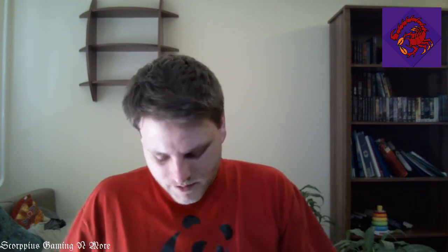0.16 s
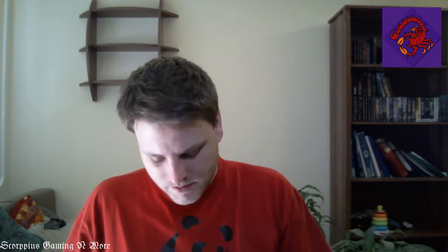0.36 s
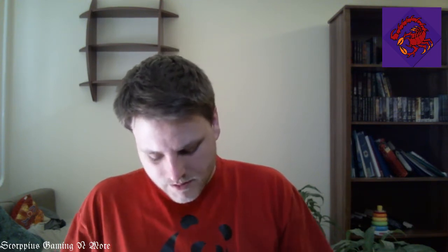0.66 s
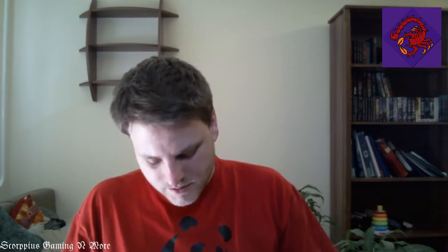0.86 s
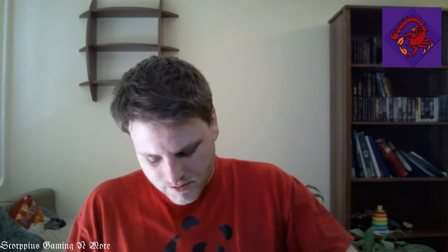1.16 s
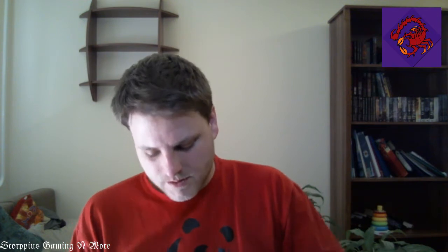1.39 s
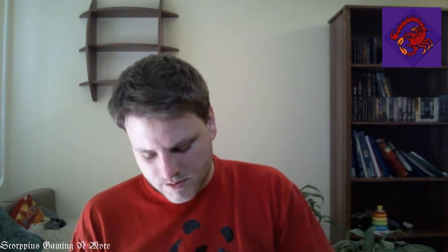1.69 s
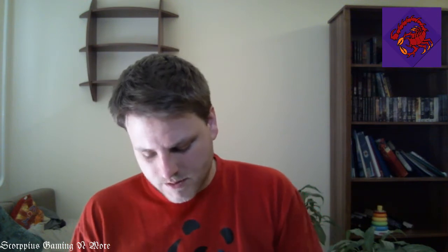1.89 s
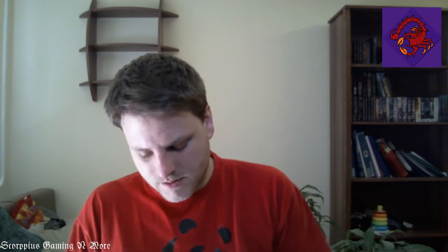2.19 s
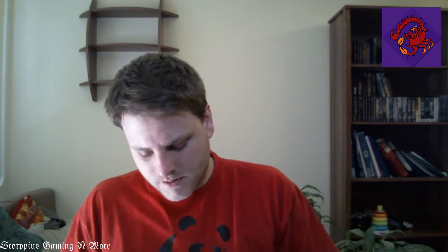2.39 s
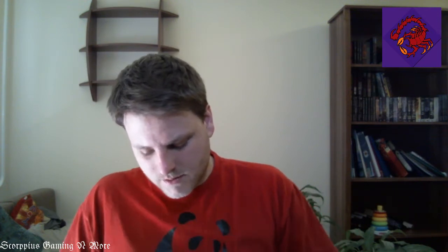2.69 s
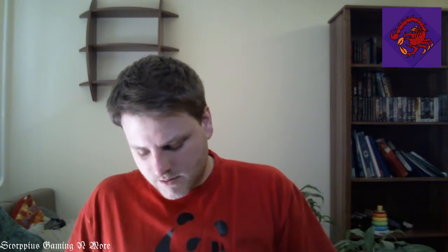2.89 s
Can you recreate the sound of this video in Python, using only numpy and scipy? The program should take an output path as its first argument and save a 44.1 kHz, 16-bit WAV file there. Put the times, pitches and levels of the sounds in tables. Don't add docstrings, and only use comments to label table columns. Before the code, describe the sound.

Stiff plastic packaging crinkles close to the microphone. From 0 to 1.1 s, short irregular squeezes give bright crackle and scattered snaps; from 1.15 to 1.55 s a dense tugging flurry with dull knocks. It eases until about 1.8 s, then builds to the sharpest cracks and a hollow thump around 2.15-2.4 s. Sparser, softer ticks follow to 3 s. Short room tail, faint low fan hum and air.

```python
import sys
import numpy as np
from scipy import signal
from scipy.fft import rfft, irfft, next_fast_len
from scipy.io import wavfile

SR = 44100
rng = np.random.default_rng(int(sys.argv[2]) if len(sys.argv) > 2 else 0)


def gain_from_db(level_db):
    decades = np.asarray(level_db, float) / 20
    return 10 ** decades


def transcribe(u):
    v = np.clip(np.atleast_2d(u).T, -1, 1)
    q = np.round(v * 32767).astype(np.int16)
    wavfile.write(sys.argv[1], SR, q)


N = 134505

# (time [s], facet level [dB], facet pitch [Hz], low voice [dB], bright edge [dB])
GRIP_SNAPS = [(0.0279, -26, 6780, -17, -11), (0.1292, -36, 7430, -9, 3), (0.1931, -28, 5150, -18, -9),
              (0.2011, -27, 4410, -6, -10), (0.3671, -31, 3320, -11, -7), (0.378, -31, 5640, -15, -3),
              (0.3812, -34, 3960, -8, -3), (0.4446, -29, 5210, -22, -4), (0.4699, -28, 5450, -5, -11),
              (0.5241, -30, 5120, -16, -3), (0.5275, -23, 5560, -14, -7), (0.5621, -31, 5020, -15, -2),
              (0.5759, -29, 6610, -13, -1), (0.5831, -26, 5810, -17, -1), (0.6288, -37, 6240, -5, 6),
              (0.6345, -32, 5210, -15, -6), (0.6825, -22, 5280, -16, -12), (0.6891, -26, 2710, -4, -2),
              (0.6981, -28, 5600, -13, -4), (0.8461, -17, 2730, -2, -10), (0.8549, -23, 3010, -2, -11),
              (0.8599, -28, 4720, -13, 1), (0.9078, -31, 3750, -7, 2), (0.913, -28, 6270, -9, -1),
              (0.9774, -33, 6270, -12, 4), (0.9849, -28, 5000, -17, -13), (1.0152, -28, 5060, -23, -7),
              (1.0192, -19, 3850, -17, -13)]
# (time [s], facet level [dB], facet pitch [Hz], low voice [dB], bright edge [dB])
TUG_SNAPS = [(1.1503, -29, 5040, -16, -1), (1.1607, -17, 3830, -10, -7), (1.171, -21, 3940, -19, -7),
             (1.1755, -30, 5470, -9, 3), (1.1894, -18, 5790, -10, -7), (1.1997, -20, 8050, -23, 0),
             (1.2092, -26, 6010, -9, -6), (1.2229, -34, 6220, -13, 2), (1.2273, -34, 3850, -9, 5),
             (1.2519, -32, 4970, -11, 6), (1.2671, -27, 5640, -13, -9), (1.2698, -30, 5640, -13, 4),
             (1.2851, -25, 5000, -15, -7), (1.2896, -25, 3290, -12, -9), (1.2968, -18, 6290, -12, -2),
             (1.3037, -21, 5210, -11, -1), (1.3092, -24, 2410, -3, -8), (1.3178, -25, 3850, -6, -5),
             (1.3279, -19, 5120, -5, -2), (1.363, -18, 6440, -16, 0), (1.3672, -19, 3010, -10, -2),
             (1.3717, -28, 6890, -13, 0), (1.3824, -27, 7880, -8, -1), (1.4109, -20, 5470, -10, -3),
             (1.4207, -19, 4260, -10, -11), (1.434, -22, 6890, -13, 0), (1.4573, -22, 2410, -5, -1),
             (1.4632, -30, 5230, -8, 1), (1.4739, -28, 5430, -11, -3), (1.4791, -19, 3620, -15, -11),
             (1.5237, -20, 4610, -24, -2), (1.5392, -27, 4390, -2, -6)]
# (time [s], facet level [dB], facet pitch [Hz], low voice [dB], bright edge [dB])
TURN_SNAPS = [(1.6246, -38, 3700, -12, 5), (1.7004, -38, 6090, -16, 4), (1.8194, -23, 6330, -31, -2),
              (1.8307, -28, 6140, -29, -3), (1.8328, -35, 5790, -26, -2), (1.8707, -34, 3920, -20, -7),
              (1.9656, -29, 3750, -8, -7), (1.981, -29, 6160, -8, -4), (2.0316, -34, 8140, -15, 1),
              (2.0916, -27, 7600, -14, -5), (2.1194, -31, 5230, -12, 6), (2.1395, -25, 5620, -12, 2),
              (2.1554, -16, 6270, -5, 1), (2.173, -24, 5730, -4, -2), (2.1802, -23, 6460, -15, -2),
              (2.183, -20, 5920, -14, -4), (2.2499, -28, 5100, -18, 1), (2.255, -33, 5750, -11, 4),
              (2.3079, -21, 6350, -11, 3), (2.3365, -21, 4540, -5, -4), (2.3403, -25, 5880, -6, -6),
              (2.3475, -28, 6200, -8, 4), (2.3626, -25, 3660, -9, 2), (2.372, -14, 6370, -14, 3),
              (2.3918, -19, 6830, -18, 0)]
# (time [s], facet level [dB], facet pitch [Hz], low voice [dB], bright edge [dB])
TEAR_SNAPS = [(2.4998, -33, 6420, -7, 9), (2.5317, -35, 5230, -13, 3), (2.5415, -32, 5100, -22, -4),
              (2.5916, -28, 4310, -8, -15), (2.5955, -19, 4310, -7, 0), (2.5996, -35, 8100, -8, 5),
              (2.6147, -28, 6910, -16, 2), (2.6299, -31, 4910, -12, -1), (2.6477, -26, 6270, -15, 0),
              (2.7161, -43, 8180, -8, 13), (2.7583, -31, 4130, -12, -15), (2.7971, -32, 7130, -13, -2),
              (2.8035, -37, 7880, -13, 5), (2.8416, -35, 6740, -15, -4), (2.8956, -38, 7190, -20, 1),
              (2.9325, -37, 5620, -20, -1), (2.9374, -31, 5190, -11, -11), (2.9829, -30, 3470, -11, -9),
              (3.0279, -31, 5280, -13, -10)]
# (time [s], facet level [dB], facet pitch [Hz], low voice [dB], bright
# edge [dB])
EXTRA_SNAPS = [
    (2.9657, -33.5, 5050, -5, -17),
]
# (start [s], length [s], crackle level [dB], flexing level [dB])
HAND_SQUEEZES = [(0, 0.064, -36, -54), (0.11, 0.087, -37, -56), (0.18, 0.12, -35.5, -52),
                 (0.288, 0.14, -40.5, -54), (0.453, 0.15, -33, -51.5), (0.619, 0.047, -36.5, -58),
                 (0.677, 0.074, -34, -42), (0.747, 0.14, -34, -70), (0.835, 0.08, -32.5, -44),
                 (0.93, 0.11, -36, -51), (1.037, 0.075, -36.5, -52), (1.139, 0.084, -34, -65),
                 (1.258, 0.088, -32, -50.5), (1.373, 0.057, -31, -41), (1.453, 0.039, -33, -42.5),
                 (1.504, 0.1, -34.5, -59), (1.621, 0.08, -42, -45), (1.719, 0.054, -36, -47.5),
                 (1.948, 0.1, -34, -48), (2.08, 0.11, -31, -38.5), (2.22, 0.056, -37.5, -53),
                 (2.306, 0.094, -33, -47), (2.335, 0.12, -36, -51.5), (2.5, 0.045, -38, -54),
                 (2.592, 0.088, -37.5, -53), (2.777, 0.075, -40, -60), (2.96, .12, -44.5, -56)]
# (time [s], peak level [dB])
PACK_KNOCKS = [(0.212, -34), (0.229, -31.5), (0.456, -34), (0.686, -27.5), (0.843, -50), (0.896, -39),
               (1.015, -33.5), (1.3, -32.5), (1.321, -28.5), (1.365, -26.5), (1.535, -27), (2.154, -16.5),
               (2.175, -29), (2.306, -27), (2.367, -24), (2.388, -28), (2.592, -28)]
# (time [s], pitch [Hz])
BODY_NOTE = [(.2, 494), (.7, 465), (.87, 785), (1.03, 547), (1.4, 670), (1.65, 353), (2.15, 450),
             (2.36, 388), (2.6, 494)]
# (frequency [Hz], level [dB])
FILM_SPECTRUM = [(300, -7.5), (900, -7), (2000, -7), (3700, -1), (6300, -1), (8000, -4), (10500, -2),
                 (16000, -8.5)]
# (frequency [Hz], width [Hz], level [dB])
FAN_RESONANCES = [(62, 22, -51.5), (84.3, 5, -54.5)]
# (frequency [Hz], level [dB])
AIR_SPECTRUM = [(15, 2), (100, -8.5), (300, -11.5), (1000, -19.5), (16000, -38.5)]


def snaps():
    decay_s, lead_s, crack = 0.00061, 0.00091, 4.45
    stretch = 0.21
    ring_width_hz, body_trim_db, trim_db = 320, -1, -0.06
    rows = GRIP_SNAPS + TUG_SNAPS + TURN_SNAPS + TEAR_SNAPS + EXTRA_SNAPS
    out = np.zeros(N + SR)
    t = np.arange(-132, 400) / SR
    core = (t > -0.0008) & (t < 0.0012)
    edges_hz = ((950, 2600), (2600, 8000), (8000, 17500))
    bands = [signal.butter(3, e, "band", fs=SR, output="sos") for e in edges_hz]
    draws = rng.standard_normal((len(rows), 2, len(t)))
    for (s, db, hz, body_db, edge_db), (noise, spikes) in zip(rows, draws):
        stretched = t / gain_from_db(stretch * (db + 27))
        shape = np.where(t < 0, 0.55 * np.exp(stretched / lead_s), np.exp(-stretched / decay_s))
        burst = shape * noise * np.exp(0.5 * spikes)
        burst = burst + crack * (t == 0) * np.sign(noise)
        body, middle, edge = (signal.sosfilt(band, burst) for band in bands)
        edge = resonate(edge, 9000 * gain_from_db(edge_db / 2 + 2), 9500)
        broad = rms_one(resonate(resonate(middle, hz, hz), hz, hz))
        facet = broad + rms_one(resonate(middle, hz, ring_width_hz))
        start = int(s * SR) - 138
        for voice, voice_db in ((body, body_db + body_trim_db), (facet, 0), (edge, edge_db)):
            out[start:start + len(t)] += gain_from_db(db + trim_db + voice_db) * voice / np.std(voice[core])
    return out[:N]


def pressure():
    attack_s, release_s, rest_crackle_db, rest_flex_db = 0.016, 0.018, -45.5, -75
    t = np.arange(N) / SR
    crackle_power, flex_power = gain_from_db(rest_crackle_db) ** 2, gain_from_db(rest_flex_db) ** 2
    for s, length, crackle_db, flex_db in HAND_SQUEEZES:
        rise = np.clip((t - s) / attack_s + 0.5, 0, 1)
        shape = rise * np.exp(-np.maximum(t - s - length, 0) / release_s * 2)
        crackle_power = crackle_power + shape * gain_from_db(crackle_db) ** 2
        flex_power = flex_power + shape * gain_from_db(flex_db) ** 2
    return np.sqrt(crackle_power), np.sqrt(flex_power)


def crackle(gain):
    ticks_per_s, tick_spread_db, clump_db, tick_cycles = 900, 3.5, 5, 2.3
    tick_db, rustle_db = -3, -4.5
    full_body_db, body_growth = -37, 0.72
    ticks = clicks(ticks_per_s * gain_from_db(clump_db * drift(70)), tick_spread_db)
    dealt = rng.integers(0, 14, N // 30 + 1).repeat(30)[:N]
    rings = np.zeros(N)
    for k, hz in enumerate(np.geomspace(700, 15000, num=14)):
        rings += resonate(ticks * (dealt == k), hz, hz * 1.24 / tick_cycles)
    rustle = rng.standard_normal(N) * gain_from_db(2.5 * drift(19.6))
    film = gain_from_db(tick_db) * rms_one(colour(rings, FILM_SPECTRUM))
    film = film + gain_from_db(rustle_db) * rms_one(colour(rustle, FILM_SPECTRUM))
    body = signal.filtfilt(*signal.butter(2, 2500, fs=SR), film)
    return gain * (film - body + body * (gain / gain_from_db(full_body_db)) ** body_growth)


def pack(gain):
    bumps_per_s, note_spread = 220, 0.59
    knock_db, knock_cycles, thud_db = 5, 4, -11
    note_hz = np.interp(np.arange(N) / SR, *np.transpose(BODY_NOTE))
    bumps = clicks(bumps_per_s, 3.9) + 0.063 * rng.standard_normal(N)
    flexing = np.zeros(N)
    for k, hz in enumerate(np.geomspace(140, 1300, num=9)):
        nearness = np.exp(-(np.log(hz / note_hz) / note_spread) ** 2)
        flexing += (-1) ** k * resonate(bumps, hz, 0.19 * hz) * nearness
    out = gain * rms_one(flexing)
    t = np.arange(1400) / SR
    for (s, db), noise in zip(PACK_KNOCKS, rng.standard_normal((len(PACK_KNOCKS), len(t)))):
        start = int((s + 0.002926) * SR)
        hz = note_hz[start]
        push = noise * np.exp(-t / 0.0033)
        knock = rms_one(resonate(push, hz, 2 * hz / knock_cycles))
        knock = knock + gain_from_db(thud_db) * rms_one(resonate(push, hz / 2.56, 105))
        out[start:start + len(t)] += gain_from_db(db + knock_db) * knock / np.abs(knock).max()
    return out


def room(x):
    t60_s, wall_cut_hz = 0.19, 18000
    size = next_fast_len(N + SR)
    w = 2 * np.pi * np.fft.rfftfreq(size)
    dull = 1 / (1 + 1j * w * SR / (2 * np.pi * wall_cut_hz))
    response = 0
    for k, lag in enumerate(rng.integers(250, 1300, 10)):
        loop = gain_from_db(-60 * lag / SR / t60_s) * dull * np.exp(-1j * w * lag)
        response = response + (-1) ** k * loop / (1 - loop)
    return irfft(rfft(x, size) * response, size)[:N]


def fan():
    hum_hz, hum_db, hum_phase_rad, air_db = 30.9, -38.3, 2.74, -50.5
    hum = np.cos(2 * np.pi * hum_hz * np.arange(N) / SR + hum_phase_rad)
    out = np.sqrt(2) * gain_from_db(hum_db) * hum
    noises = rng.standard_normal((len(FAN_RESONANCES), N + SR))
    for (hz, width_hz, db), noise in zip(FAN_RESONANCES, noises):
        rumble = resonate(resonate(noise, hz, width_hz), hz, width_hz)
        out += gain_from_db(db) * rms_one(rumble[SR:])
    return out + gain_from_db(air_db) * rms_one(colour(rng.standard_normal(N), AIR_SPECTRUM))


def rms_one(x):
    return x / np.sqrt(np.mean(x ** 2) + 1e-20)


def resonate(x, hz, width_hz):
    r = np.exp(-np.pi * width_hz / SR)
    turn = 2 * np.pi * min(hz, 0.45 * SR) / SR
    zeros = [(1 - r * r) / 2, 0, (r * r - 1) / 2]
    return signal.lfilter(zeros, [1, -2 * r * np.cos(turn), r * r], x + 1e-18)


def clicks(per_s, spread_db):
    sizes = gain_from_db(spread_db * np.minimum(rng.exponential(1, N), 3.1)) * rng.choice([-1, 1], N)
    return sizes * (rng.random(N) < per_s / SR)


def drift(rate_hz):
    r = np.exp(-2 * np.pi * rate_hz / SR)
    return rms_one(signal.lfilter([1], [1, -2 * r, r * r], rng.standard_normal(N + SR))[SR:])


def colour(x, points):
    hz, db = np.transpose(points)
    log_hz = np.log(np.fft.rfftfreq(len(x), 1 / SR) + 1)
    return irfft(rfft(x) * gain_from_db(np.interp(log_hz, np.log(hz), db)), len(x))


def scene():
    room_db = -26
    crackle_gain, flex_gain = pressure()
    near = snaps() + crackle(crackle_gain) + pack(flex_gain)
    return (near + gain_from_db(room_db) * room(near) + fan())[None]


def band_limit(x):
    return signal.sosfilt(signal.butter(12, 17140, fs=SR, output="sos"), x)


def record(dry):
    cutoff_hz = 16050
    rounded = 1.05 * np.tanh(dry / 1.05)
    mix = signal.sosfilt(signal.ellip(12, 0.3, 60, cutoff_hz, fs=SR, output="sos"), rounded)
    return band_limit(mix)


dry = scene()
out = record(dry)
transcribe(out)
```